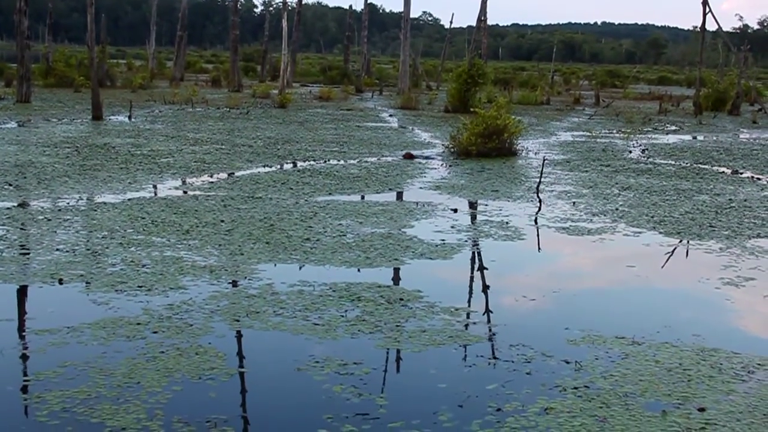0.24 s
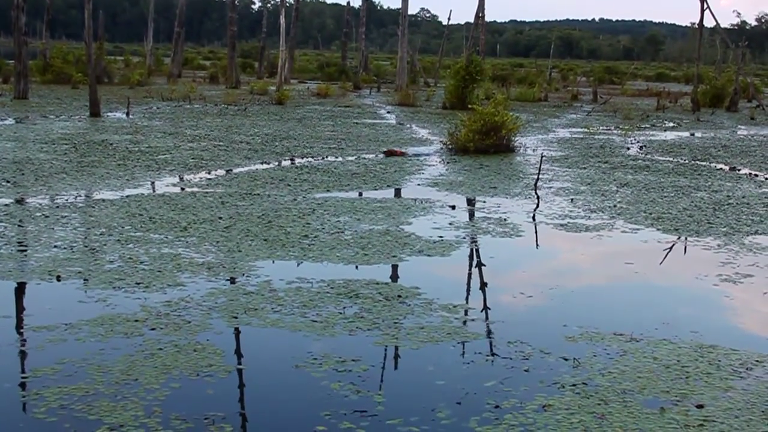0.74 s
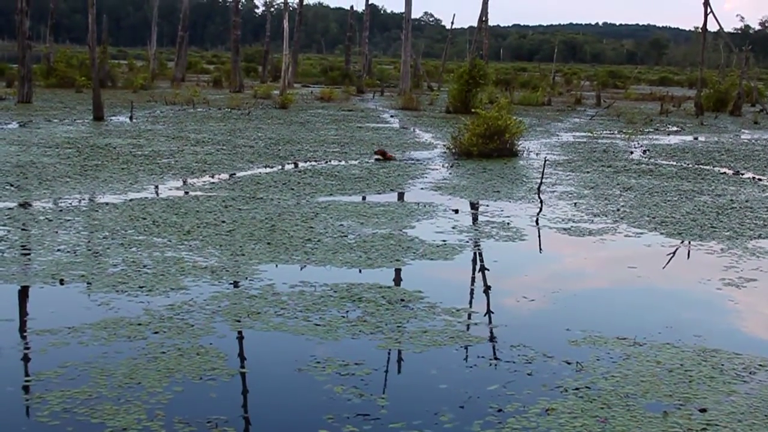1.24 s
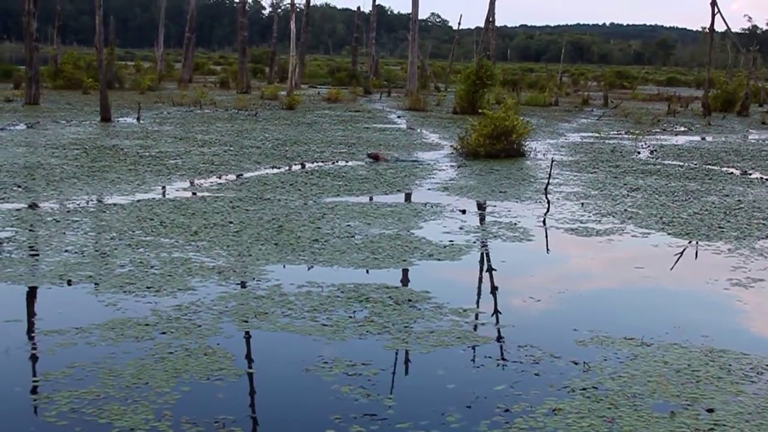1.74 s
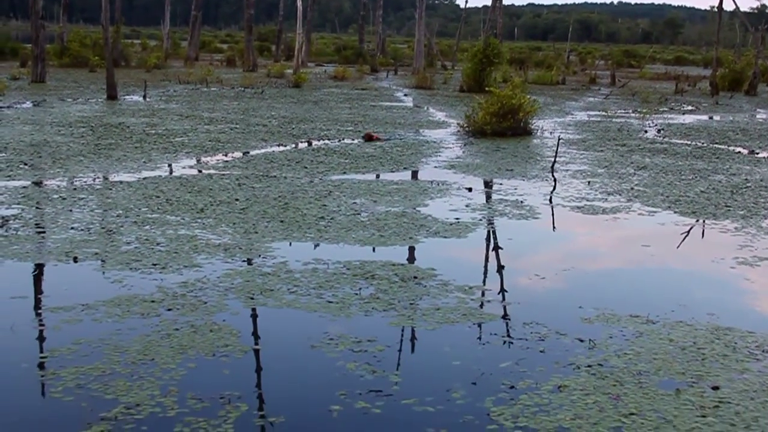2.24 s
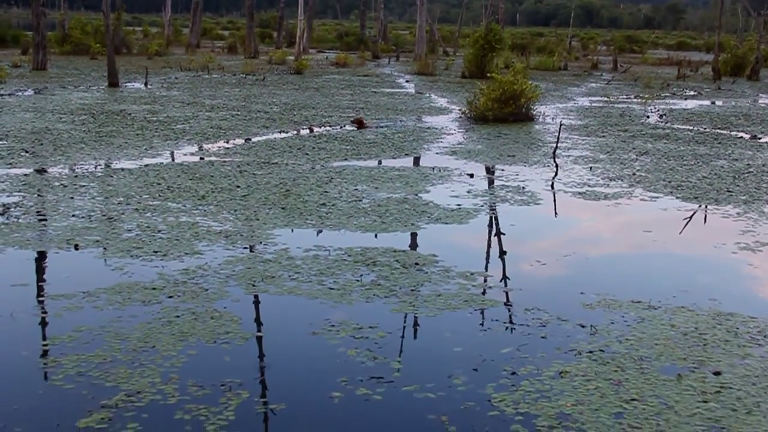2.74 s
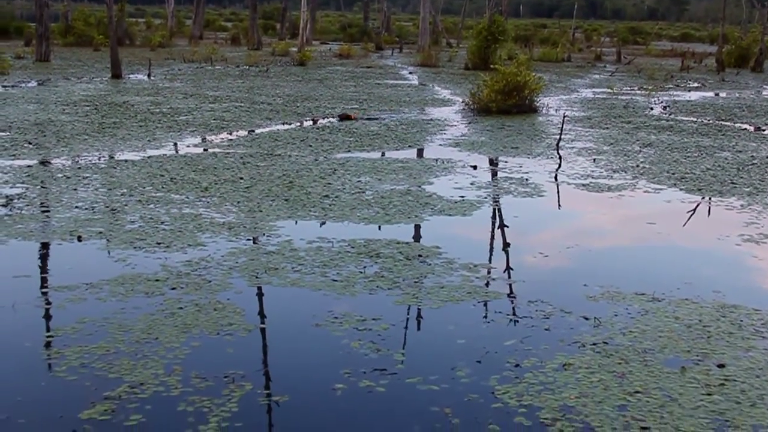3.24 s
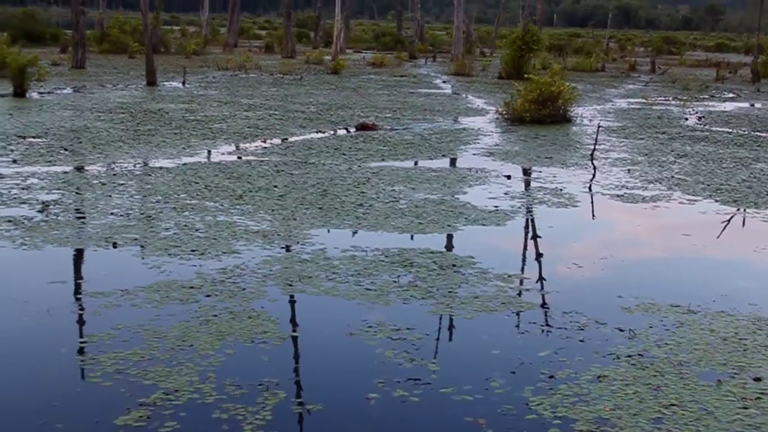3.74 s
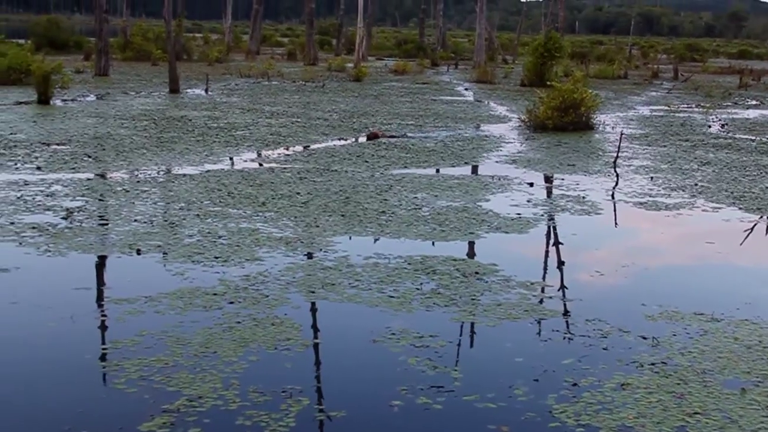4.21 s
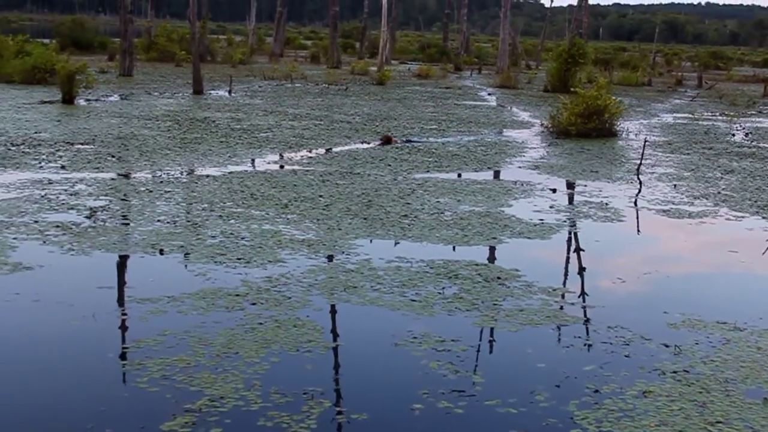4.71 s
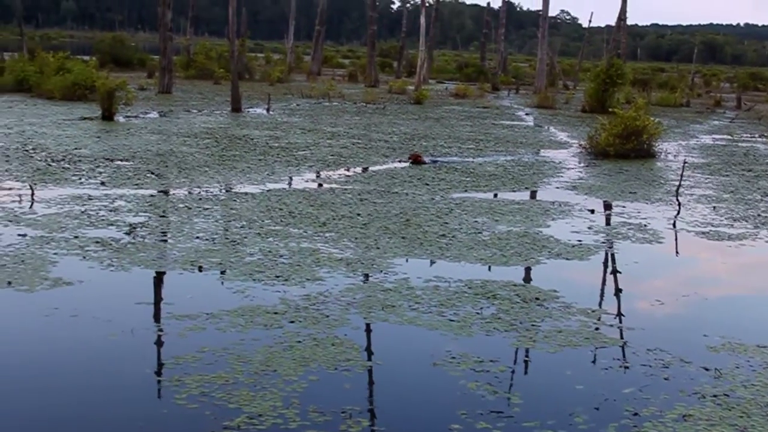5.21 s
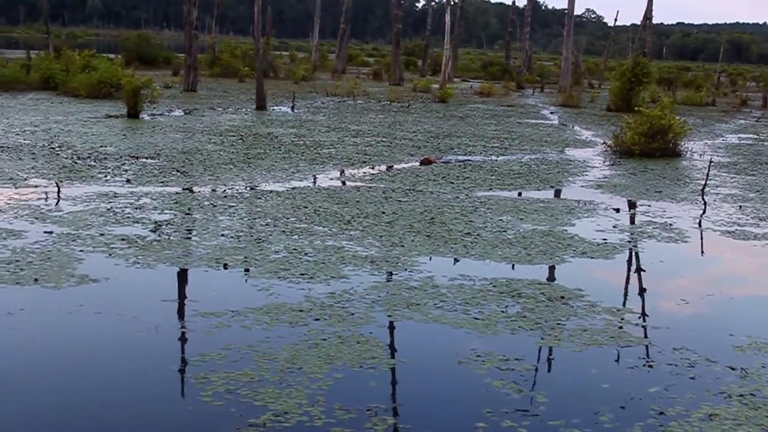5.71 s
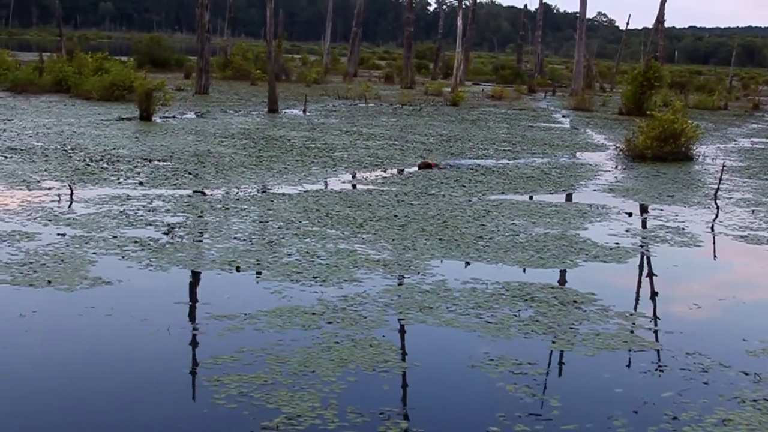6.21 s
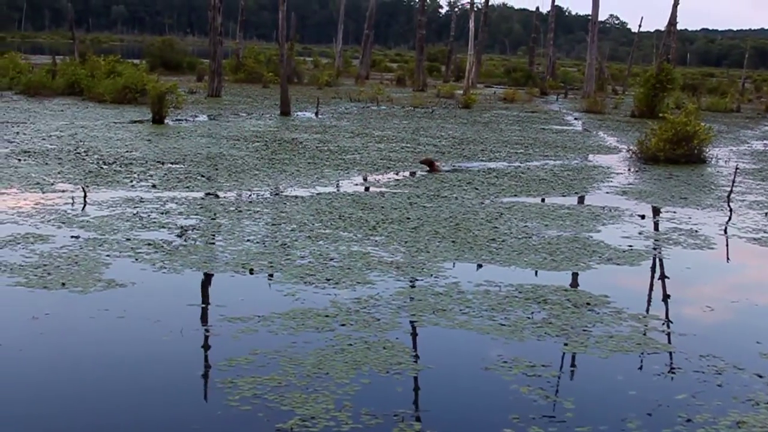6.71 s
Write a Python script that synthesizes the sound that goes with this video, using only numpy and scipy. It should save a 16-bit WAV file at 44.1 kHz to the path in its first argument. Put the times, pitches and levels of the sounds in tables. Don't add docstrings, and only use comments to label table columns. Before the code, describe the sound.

Cicadas and insects shimmer steadily over a still marsh at dusk, with small water plops, dry twig cracks and a faint engine drone far off.

```python
import sys
import numpy as np
from scipy import signal
from scipy.fft import rfft, irfft
from scipy.io import wavfile

SR = 44100
rng = np.random.default_rng(int(sys.argv[2]) if len(sys.argv) > 2 else 0)


def wrap_up_sound(samples):
    columns = np.atleast_2d(samples).T
    tamed = np.clip(columns, -1, 1)
    steps = np.round(tamed * 32767).astype(np.int16)
    wavfile.write(sys.argv[1], SR, steps)


def elevation(decibels):
    levels = np.asarray(decibels, float)
    return 10 ** (levels / 20)


N = 306495
TIME = np.arange(N) / SR

# (time [s], gain [dB])
MIC_GAIN = [(0, -10), (.5, -7.5), (1.4, -4), (2.4, -0.5), (6.95, .5)]
# (time [s], low edge [Hz], high edge [Hz], level [dB])
SIDE_HISS = [
    (.6066, 11000, 12500, -68),
    (3.5788, 4100, 6400, -44),
    (3.5788, 9000, 11800, -58),
    (3.5788, 14500, 15500, -61),
    (5.599, 7600, 9700, -57),
    (5.9937, 10300, 11700, -62),
]

# (frequency [Hz], level [dB per Hz])
RUMBLE = [(13, -51), (22, -30), (59, -4.5), (108, -1), (138, -1), (178, 0.5), (248, -3), (288, -1.5),
          (380, -9.5), (600, -6), (780, -5.5), (1320, -120)]
# (frequency [Hz], level [dB per Hz])
AIR = [(1500, -29), (2500, 6), (6500, 0), (8000, 2), (9500, -8), (11000, -4), (16000, -1)]
# (frequency [Hz], level [dB per Hz])
TRICKLE = [(350, -10), (500, -18), (700, 0.5), (900, 3), (1100, 1.5), (1300, 4.5), (1450, -3.5), (2000, -8),
           (2600, -30)]
# (time [s], level [dB])
FLOW = [(0, -48.5), (.4, -48), (1.4, -44.5), (2, -45.5), (2.4, -46), (3.6, -46), (4.2, -47), (5.1, -47),
        (6.2, -46.5), (6.95, -47)]

# (time [s], firing rate [Hz], even orders [dB], odd orders [dB])
ENGINE = [(0, 72.5, -92, -95), (1.9, 69.8, -81, -84), (2.3, 72.25, -54.5, -63), (2.85, 71.8, -59, -68),
          (3.3, 72.8, -82, -78), (3.65, 73.7, -53.5, -66), (4, 75.8, -54, -68), (4.5, 75.55, -58, -60),
          (4.9, 75.8, -55, -52.5), (5.3, 76.47, -55.5, -50), (6, 76.24, -51.5, -51),
          (6.5, 75.86, -48, -49.5), (6.95, 76.2, -48.5, -49.5)]
ORDERS_DB = -11.5, -7, -4.5
# (order [firing rates], level [dB])
HALF_ORDERS = [(1.5, -56), (2.5, -56.5)]
# (centre [s], length [s], level [dB])
UNEVEN = [
    (2.9, 0.85, 1.5),
]

# (centre [s], length [s], level [dB])
FAR_FROGS = [
    (2.6, 0.55, -51),
    (5.6, 2.73, -47.5),
]
# (frequency [Hz], width [Hz], level [dB])
FROG_THROAT = [(880, 360, 0)]
# (centre [s], length [s], level [dB])
FAR_CRICKETS = [
    (.4, 1.0, -47),
]
# (frequency [Hz], width [Hz], level [dB])
CRICKET_WING = [(3500, 360, 0)]
# (time [s], peak [dB], pitch [Hz])
CHIRPS = [(.028, -41, 4800), (.068, -42.5, 3600), (.122, -40.5, 4760), (.165, -41.5, 3500),
          (.22, -40.5, 4530), (.287, -42, 4500), (.39, -41.5, 4450), (.675, -45, 3700), (.74, -41, 3650),
          (1.474, -42, 2610), (1.696, -42, 2960), (2.105, -40, 2500), (3.605, -41, 2480)]
# (time [s], peak [dB], pitch [Hz])
PEEPS = [(.628, -46, 1140), (1.265, -47, 1530), (1.29, -44, 596), (6.003, -35, 5340), (3.005, -41, 610),
         (3.715, -38.5, 1260), (4.01, -41, 690), (4.11, -43, 694), (5.36, -37, 937), (5.418, -41, 924),
         (5.475, -37, 798), (6.121, -33.5, 884)]

# (time [s], length [s], level [dB], brightness [Hz])
SLOSHES = [(0.354, 0.02, -50, 3500), (0.623, 0.084, -50.5, 1500), (0.95, 0.13, -49, 2500),
           (1.47, 0.011, -38, 900), (1.493, 0.02, -45, 1300), (1.52, 0.023, -45, 1500),
           (1.663, 0.011, -49, 4500), (1.695, 0.04, -45, 3000), (1.722, 0.014, -48, 1600),
           (2.384, 0.023, -48, 200), (3.087, 0.065, -48, 3500), (5.247, 0.04, -43, 1490),
           (5.664, 0.078, -42.5, 2500)]
# (time [s], peak [dB], pitch [Hz])
PLOPS = [(.351, -43, 537), (.528, -51, 690), (.62, -44, 530), (.906, -38, 674), (1.472, -29, 550),
         (1.681, -34, 540), (2.105, -32, 730), (2.114, -35, 1247), (2.148, -37, 665), (2.199, -33.5, 680),
         (2.231, -34.5, 630), (3.63, -31, 1272), (5.053, -31, 1330), (5.396, -28.5, 740),
         (6.635, -35, 1417)]
# (time [s], peak [dB], pitch [Hz], length [ms])
GULPS = [
    (.522, -44, 621, 22.2),
    (.536, -46, 914, 12),
    (.63, -50, 564, 18),
    (1.472, -43, 128, 9.9),
    (1.484, -40, 735, 9.2),
    (1.702, -40, 266, 16),
]
# (time [s], peak [dB], pitch [Hz])
DRIPS = [(.354, -44, 1680), (.38, -49, 1840), (.866, -43, 1750), (0.91, -37, 1590), (.963, -38, 1630),
         (1.266, -43, 1770), (1.475, -33, 1420), (1.514, -41, 1830), (1.72, -40, 1490), (1.729, -47, 2940),
         (2.202, -42, 2060), (2.423, -41, 2110), (3.072, -37, 2700), (3.095, -33, 2630), (3.231, -38, 2260),
         (4.414, -38, 2480), (4.433, -36.5, 2096), (4.464, -36, 1510), (4.762, -41, 1960),
         (5.211, -37, 1720), (5.226, -40, 1793), (5.242, -36, 2570), (5.299, -36, 2480), (5.372, -35, 1760),
         (5.653, -44, 2103), (5.674, -38, 1914), (5.707, -30.5, 1530), (6.02, -34.5, 1560),
         (6.841, -26.5, 2600)]
# (time [s], peak [dB], pitch [Hz])
PATTER = [(1.521, -39, 800), (1.582, -41, 2900), (2.169, -43, 850), (2.181, -41, 880), (2.208, -38, 750),
          (2.259, -39, 1300), (2.267, -40, 850), (5.226, -35, 350), (5.255, -41, 1750), (5.298, -37, 1350),
          (5.348, -38, 1200), (5.432, -38, 1600), (5.477, -38, 1220), (5.503, -36, 1250),
          (5.568, -33, 1320), (5.581, -36, 1230), (5.605, -41, 1800), (5.673, -38, 1300),
          (5.706, -37, 1000), (5.737, -37, 950), (6.409, -36, 2980)]
# (time [s], peak [dB], pitch [Hz])
RATTLE = [(1.663, -36, 3650), (1.666, -40, 1350), (1.674, -37, 2600), (1.675, -41, 4200),
          (1.692, -40, 3100), (1.698, -40, 3000), (1.704, -41, 3200), (1.709, -40, 2200),
          (1.717, -38, 1400), (1.722, -38, 1200), (1.727, -37, 1300), (1.731, -36, 1200),
          (1.731, -41, 3000)]
# (time [s], peak [dB], ring [Hz])
CRACKS = [(0.35, -34, 1740), (0.377, -26, 1190), (0.863, -29, 1710), (0.907, -32, 1570), (0.929, -35, 977),
          (1.264, -24.5, 1640), (1.289, -28, 1060), (1.329, -23, 1100), (1.471, -35, 1380),
          (1.475, -31, 1330), (1.519, -39, 1130), (1.662, -36, 1310), (1.672, -37, 1070),
          (1.663, -33, 3700), (1.674, -32, 2700), (1.709, -30, 1900), (1.731, -28, 3000), (.962, -33, 1900),
          (6.018, -30, 850), (3.094, -30, 1900), (4.432, -28, 2300), (1.728, -32, 1140), (2.099, -29, 2480),
          (3.091, -21.5, 1190), (4.43, -28, 3170), (5.225, -25, 947), (5.371, -42, 929), (5.651, -32, 3163),
          (5.672, -36, 908), (5.707, -35, 1550), (6.018, -29, 1390), (6.53, -26, 1270), (6.839, -26, 2990)]
# (time [s], peak [dB])
SNAPS = [
    (0.9737, -44),
    (1.7275, -44),
    (3.0944, -36),
    (3.9055, -41),
    (4.8264, -38),
    (4.8908, -43),
    (5.687, -37),
    (5.7054, -42),
    (6.8384, -46),
]

# (frequency [Hz], level [dB per Hz])
CROWD = [(5590, -54), (9500, -5), (10600, -8.5), (12700, 3), (15000, -1), (15900, -4)]
# (centre [s], length [s], level [dB])
CROWD_BOUTS = [
    (.7, 0.46, -56),
    (1.4, 0.42, -54.5),
    (2, .5, -57),
    (2.85, 0.44, -66),
    (5.4, 0.56, -58.5),
    (6.95, .5, -60),
]
# (frequency [Hz], width [Hz], level [dB])
LOW_WING = [(11800, 2100, -2), (13000, 1100, 0)]
# (centre [s], length [s], level [dB])
LOW_BOUTS = [
    (.35, .5, -57),
    (2.2, 0.75, -56.5),
    (3.1, .4, -62),
    (4, 0.96, -58.5),
    (5, 0.43, -62),
    (5.8, 0.61, -62),
    (6.95, 0.36, -59),
]
# (frequency [Hz], width [Hz], level [dB])
HIGH_WING = [(13250, 1100, 0), (14200, 1000, -1), (15300, 1100, -1)]
# (centre [s], length [s], level [dB])
HIGH_BOUTS = [
    (0, 0.35, -50),
    (1.1, .4, -54),
    (1.62, .3, -51),
    (3.2, 0.55, -51),
    (5.15, 0.91, -57),
    (6.3, .8, -69),
]
# (time [s], lead over an even beat [strokes])
HIGH_LEAD = [(0, 0), (2, .03), (2.4, -.28), (3.5, -.28), (5.2, 1.3), (5.8, 1.3), (6.95, 2.5)]
# (frequency [Hz], width [Hz], level [dB])
TICK_WING = [(12640, 1800, -2.5), (14400, 1000, 2), (15400, 700, -1)]
# (time [s], peak [dB])
WING_TICKS = [(.2713, -34), (.8929, -39), (1.0266, -38), (1.7704, -29), (2.176, -34), (2.4533, -24),
              (2.5386, -29), (2.578, -26), (2.6534, -29), (2.7207, -28), (2.7651, -22), (3.2216, -34),
              (3.6386, -30), (3.704, -28), (4.0345, -37), (4.1415, -37), (4.4293, -37), (4.5421, -32),
              (4.787, -28), (4.8464, -28), (5.1477, -40), (5.2487, -39), (5.7089, -25), (5.7438, -30),
              (6.053, -23.5), (6.129, -31), (6.1903, -25), (6.2484, -32), (6.4206, -26), (6.9267, -37)]
# (time [s], ticks [count], peak [dB])
TICK_RUNS = [
    (1.646, 5, -38),
    (2.578, 2, -33),
    (2.9961, 7, -35),
    (3.2849, 4, -45),
    (5.913, 2, -36),
    (5.9695, 3, -40),
    (6.0866, 1, -36),
    (6.163, 1, -36),
    (6.328, 3, -34),
]

# (time [s], steady group [dB], throbbing group [dB], throb depth [0-1])
CICADAS = [(0, -38.5, -54, .3), (1, -41, -49.5, 0.1), (2.4, -42, -53, .2), (3, -40.5, -49, 0),
           (3.5, -40, -44, .3), (4.1, -39, -43.5, 0.26), (5, -40, -40.5, 0.3), (5.6, -38, -45, 0.64),
           (6.5, -40, -42.5, 0.28), (6.95, -38, -47, 0.1)]
# (time [s], rate [strokes per s])
STROKES = [(0, 47.35), (2, 47.55), (3.5, 47.7), (6.95, 47.8)]
# (frequency [Hz], width [Hz], level [dB])
STEADY_BODY = [(2223, 220, -11.5), (2537, 160, -8), (2778, 120, -10), (3090, 57, -2), (3296, 230, -3.5),
               (3654, 500, -4.5), (4156, 315, -1), (4548, 296, 2.5), (4900, 220, -0.5), (5267, 400, -1.5),
               (5710, 710, -5.5), (6130, 640, -7), (6600, 440, -10.5), (7230, 420, -13.5)]
# (frequency [Hz], width [Hz], level [dB])
NEAR_BODY = [(3980, 180, -2), (4210, 170, 2), (4480, 180, -2), (4860, 120, -5)]
# (time [s], lead over an even beat [throbs])
THROB_LEAD = [(0, .7), (2.5, .65), (3.5, 1.08), (4.0, 1.1), (4.7, 1.21), (5.1, 1.23), (5.5, 1.13),
              (5.9, 1.07), (6.3, 1.1), (6.95, 1.2)]
# (lead [throbs], share of depth [ratio], resonances (frequency [Hz], width [Hz], level [dB]))
THROB_BODY = [
    (0, 1.52, [(2685, 60, -2.5), (2918, 150, -1.5), (3150, 240, -6.5), (3367, 260, -3.5), (3514, 96, 1), (3966, 183, 6), (5790, 130, -3.5), (6026, 92, -1.5), (6340, 90, -3), (6960, 360, -10)]),
    (.08, 1.2, [(4223, 180, -1), (4600, 140, -10)]),
    (.33, 1.8, [(5010, 190, -3), (5320, 210, -1.5)]),
]
THROB_GROUPS_DB = (-2.5, -7, -9)
# (delay [s], level [dB])
ECHOES = [
    (.0229, -11),
    (.0242, -12),
    (.0258, -12),
]

THROBS_PER_S = 10.1
SMALLER_RINGS_SHORTER = -0.21


def rms_one(x):
    return x / np.sqrt(np.mean(x ** 2) + 1e-20)


def in_time(rows):
    s, *columns = np.transpose(rows)
    return [np.interp(TIME, s, column) for column in columns]


def drift(rate):
    r = np.exp(-80 * np.pi * rate / SR)
    slow = signal.lfilter([1], [1, -2 * r, r * r], rng.standard_normal(N // 40 + 2002))[2000:]
    return np.interp(np.arange(N) / 40, np.arange(len(slow)), rms_one(slow))


def coloured(x, spectrum):
    hz, db = np.transpose(spectrum)
    bins = np.arange(N // 2 + 1) * SR / N + 1
    shape = np.interp(np.log(bins), np.log(hz), db, left=-80, right=-80)
    return rms_one(irfft(rfft(x) * elevation(shape), N))


def resonant(x, body):
    out = 0
    for k, (hz, width, db) in enumerate(body):
        r = np.exp(-np.pi * width / SR)
        b = (1 - r * r) / 2 * np.array([1, 0, -1])
        a = [1, -2 * r * np.cos(2 * np.pi * hz / SR), r * r]
        ring = signal.lfilter(b, a, signal.lfilter(b, a, x))
        out = out + (-1) ** k * elevation(db) * ring
    return rms_one(out)


def strokes(cycles, sharp):
    return np.exp(sharp * (np.cos(2 * np.pi * cycles) - 1))


def grains(per_s, spread_db):
    size = elevation(spread_db * np.minimum(rng.exponential(1, N), 5)) * rng.choice([-1, 1], N)
    return size * (rng.random(N) < per_s / SR) + 1e-18


def swells(rows):
    out = np.zeros(N)
    for s, length, db in rows:
        near = slice(max(0, round((s - 2 * length) * SR)), round((s + 2 * length) * SR))
        out[near] += elevation(db) * np.exp(-np.log(16) * ((TIME[near] - s) / length) ** 2)
    return out


def blips(rows, rise, rough):
    out, t = np.zeros(N), np.arange(SR // 12) / SR
    wobble = signal.lfilter([1], [1, -.92], rng.standard_normal((len(rows), len(t))))
    for (s, db, hz, ms), noise in zip(rows, rms_one(wobble)):
        tau = ms / 3000
        fade = (t / tau * np.exp(1 - t / tau)) ** .75
        tone = np.sin(2 * np.pi * hz * t * (1 - 2 * rise + rise * t / tau)) * fade
        at = round((s - tau) * SR)
        out[at:at + len(t)] += elevation(db - 2.5) * (tone * (1 + rough * noise))[:N - at]
    return out


def bubbles():
    born, dealt = grains(900, spread_db=1.0), rng.integers(0, 14, N)
    rings = 0
    for k, hz in enumerate(np.geomspace(380, 2500, num=14)):
        of_this_size = born * (dealt == k) + 1e-18
        rings = rings + resonant(of_this_size, [(hz, 0.16 * hz, 0)]) * np.sqrt(hz)
    return rms_one(rings) + 4.4 * rng.standard_normal(N)


def beds():
    rumble = elevation(-49 + 1.12 * drift(12)) * coloured(rng.standard_normal(N), RUMBLE)
    trickle = elevation(in_time(FLOW)[0] + 0.33 * drift(7.4)) * coloured(bubbles(), TRICKLE)
    hiss = elevation(-46.5) * coloured(rng.standard_normal(N), AIR)
    return rumble + trickle + hiss


def engine():
    firing_hz, even_db, odd_db = in_time(ENGINE)
    turns = np.cumsum(firing_hz) / SR
    first_db, second_db, fifth_db = ORDERS_DB
    levels_db = [odd_db + first_db, even_db + second_db, odd_db, even_db, odd_db + fifth_db]
    tones = [(k + 1, elevation(db)) for k, db in enumerate(levels_db)]
    tones += [(order, elevation(db) * swells(UNEVEN)) for order, db in HALF_ORDERS]
    out = 0
    for order, gain in tones:
        waver_db, slip = 1.5 * drift(3), .3 * drift(3)
        out = out + gain * elevation(waver_db) * np.sin(2 * np.pi * order * turns + slip)
    return out


def far_calls():
    frogs = swells(FAR_FROGS) * resonant(grains(700, spread_db=2.5), FROG_THROAT)
    pulse = rms_one(strokes(THROBS_PER_S * TIME + .33, sharp=.8))
    crickets = swells(FAR_CRICKETS) * pulse * resonant(grains(1500, spread_db=2.5), CRICKET_WING)
    return frogs + crickets


def calls():
    chirp_ms, peep_ms = 15, 10
    rows = [(*row, chirp_ms) for row in CHIRPS] + [(*row, peep_ms) for row in PEEPS]
    return blips(rows, rise=.001, rough=.7)


def sloshes():
    source, out = grains(6600, spread_db=5.0), np.zeros(N)
    for s, length, db, hz in SLOSHES:
        near = slice(round((s - .25) * SR), round((s + .25) * SR))
        dulled = signal.lfilter(*signal.butter(1, [130, hz], "band", fs=SR), source[near])
        out[near] += swells([(s, length, db)])[near] * rms_one(dulled)
    return out


def drops():
    ring_ms = 5.35
    rows = [(s, db, hz, ring_ms * (hz / 1000) ** SMALLER_RINGS_SHORTER) for s, db, hz in PLOPS]
    return blips(rows, rise=.008, rough=.3) + blips(GULPS, rise=.11, rough=.1)


def taps():
    out, t = np.zeros(N), np.arange(SR // 40) / SR
    rows = DRIPS + RATTLE + PATTER
    noises = rng.standard_normal((len(rows), len(t)))
    noises = rms_one(signal.lfilter(*signal.butter(1, [500, 4500], "band", fs=SR), noises))
    for (s, db, hz), noise in zip(rows, noises):
        tau = .0029 * (hz / 2000) ** SMALLER_RINGS_SHORTER
        ring = np.sin(2 * np.pi * hz * t) * np.exp(-t / tau) * (1 - np.exp(-t * hz * 2))
        snap = elevation(-6) * noise * np.exp(-t / .0007)
        at = round((s - .001) * SR)
        out[at:at + len(t)] += elevation(db + 3.5) * (ring + snap)
    return out


def cracks():
    out, t = np.zeros(N), np.arange(SR // 50) / SR
    splinters = rng.standard_normal((len(CRACKS), len(t))) * np.exp(-t / .0016)
    for (s, db, hz), splinter in zip(CRACKS, splinters):
        ring = signal.lfilter(*signal.butter(2, [0.41 * hz, 1.7 * hz], "band", fs=SR), splinter)
        at = round(s * SR)
        out[at:at + len(t)] += elevation(db - 7.0) * ring / np.abs(ring).max()
    return out


def snaps():
    clicks, t = np.zeros(N) + 1e-18, np.arange(100) / SR
    for (s, db), noise in zip(SNAPS, rng.standard_normal((len(SNAPS), len(t)))):
        clicks[round(s * SR):][:len(t)] = elevation(db + 10.5) * noise * np.exp(-t / 0.00061)
    return signal.sosfilt(signal.butter(2, [7500, 13000], "band", fs=SR, output="sos"), clicks)


def wing_ticks():
    spacing_s = .0205
    runs = [(s + k * spacing_s, db) for s, count, db in TICK_RUNS for k in range(count)]
    rows = []
    for s, db in WING_TICKS + runs:
        length = .009 + .0004 * max(db + 34, 0)
        rows.append((s + 0.36 * length, length, db - 17.0))
    return swells(rows) * resonant(rng.standard_normal(N), TICK_WING)


def katydids():
    crowd = elevation(2.0 * drift(30)) * coloured(rng.standard_normal(N), CROWD)
    out = (elevation(-57.5) + swells(CROWD_BOUTS)) * crowd
    low = np.cumsum(52.5 * (1 + 0.0122 * drift(1.03))) / SR
    high = 48.5 * TIME + in_time(HIGH_LEAD)[0]
    groups = ((-64, LOW_BOUTS, low, LOW_WING), (-68, HIGH_BOUTS, high, HIGH_WING))
    for rest_db, bouts, cycles, wing in groups:
        gate = rms_one(strokes(cycles, sharp=1.5) * elevation(3.2 * drift(14)))
        out += (elevation(rest_db) + swells(bouts)) * resonant(gate * rng.standard_normal(N), wing)
    return out


def tymbal():
    part = np.arange(928) / 928
    ribs = 0
    for k in range(7):
        size = .55 if k % 2 else 1
        ribs = ribs + size * np.exp(-((part - .06 - k * .128) / .032) ** 2)
    cycles = np.cumsum(in_time(STROKES)[0] * (1 + .0012 * drift(3))) / SR
    now = (cycles % 1 * len(part)).astype(int)
    same, fresh = rng.standard_normal(len(part))[now], rng.standard_normal(N)
    return rms_one(ribs[now] * (same + 0.34 * fresh))


def cicadas():
    steady_db, throb_db, depth = in_time(CICADAS)
    clicks = tymbal()
    steady = resonant(elevation(-4.0) * clicks + rng.standard_normal(N), STEADY_BODY)
    beat = THROBS_PER_S * TIME + in_time(THROB_LEAD)[0]
    source = elevation(-9.5) * clicks[::-1] + rng.standard_normal(N)
    pumped = 0
    for (early, share, body), db in zip(THROB_BODY, THROB_GROUPS_DB):
        turn = 2 * np.pi * (beat + early)
        throb = 1 + share * depth * (np.cos(turn) + 0.33 * np.sin(2 * turn))
        pumped = pumped + elevation(db) * np.clip(throb, .05, 3) * resonant(source, body)
    pumped = pumped + sum(elevation(db) * np.roll(pumped, round(s * SR)) for s, db in ECHOES)
    near = elevation(-46.5) * resonant(clicks, NEAR_BODY)
    steady = elevation(steady_db + 0.43 * drift(2.2)) * steady
    return steady + elevation(throb_db + 0.14 * drift(9.4)) * pumped + near


def scene():
    steady = elevation(in_time(MIC_GAIN)[0]) * (beds() + far_calls() + katydids() + cicadas())
    water = sloshes() + drops() + taps()
    mono = steady + engine() + calls() + water + cracks() + snaps() + wing_ticks()
    return np.array([mono, mono])


def band_limit(x):
    return signal.sosfilt(signal.butter(12, 15730, fs=SR, output="sos"), x)


def record(dry):
    side, window = np.zeros(N), np.hanning(2048) ** .5
    for (s, low_hz, high_hz, db), noise in zip(SIDE_HISS, rng.standard_normal((len(SIDE_HISS), 2048))):
        band = signal.sosfilt(signal.butter(6, [low_hz, high_hz], "band", fs=SR, output="sos"), noise)
        side[round(s * SR) - 1024:][:2048] += elevation(db) * window * rms_one(band)
    mix = dry + side * [[1], [-1]]
    return band_limit(mix)


dry = scene()
out = record(dry)
wrap_up_sound(out)
```